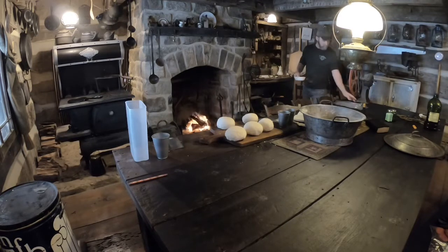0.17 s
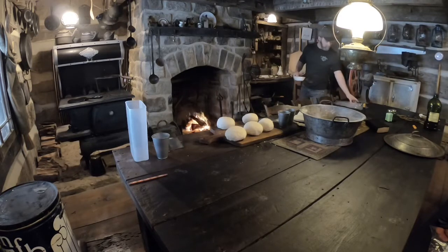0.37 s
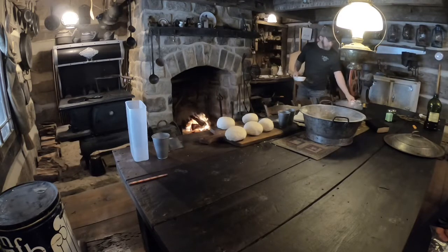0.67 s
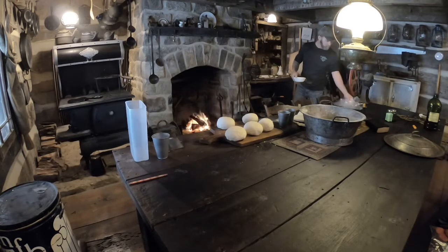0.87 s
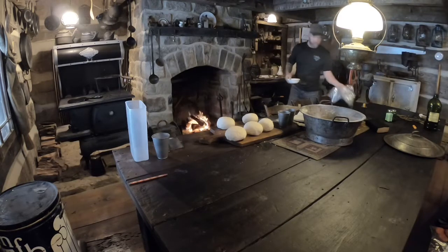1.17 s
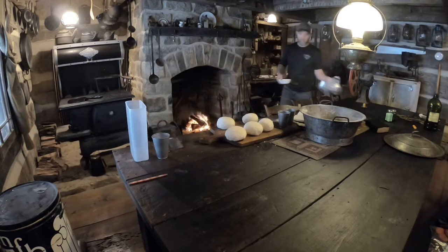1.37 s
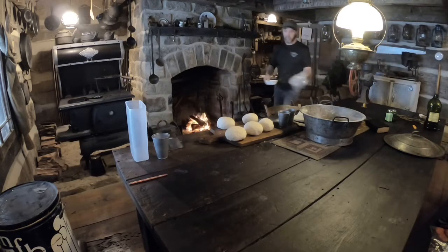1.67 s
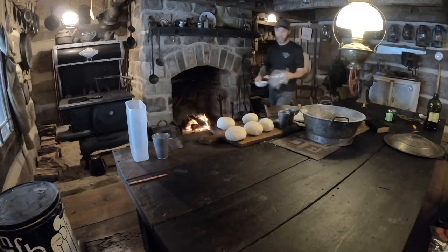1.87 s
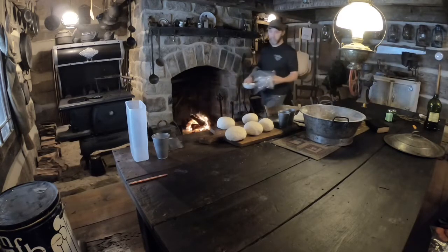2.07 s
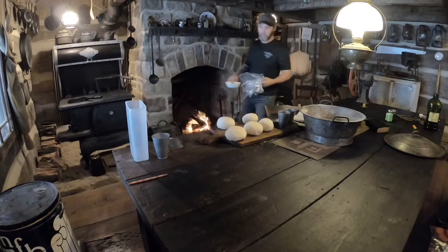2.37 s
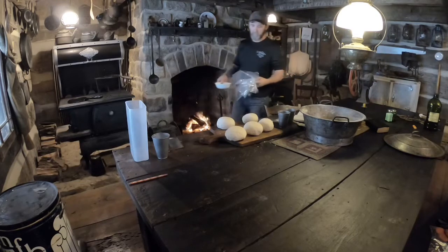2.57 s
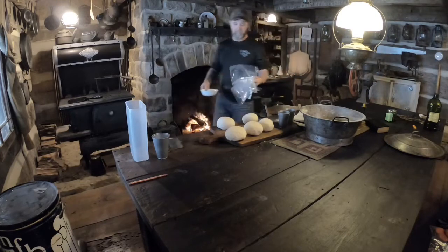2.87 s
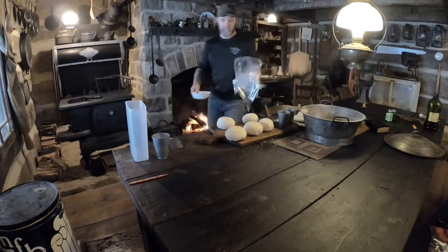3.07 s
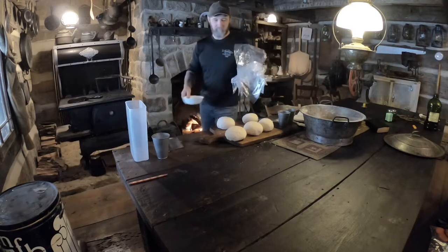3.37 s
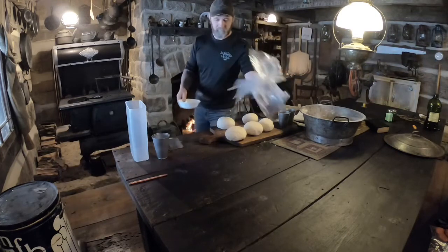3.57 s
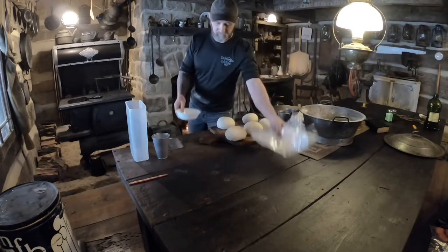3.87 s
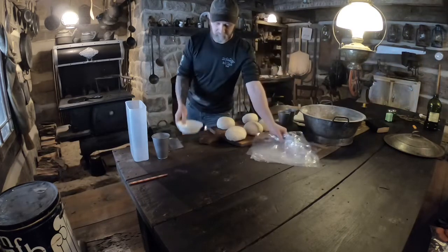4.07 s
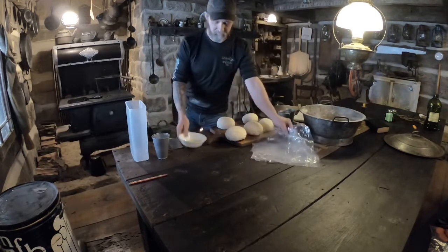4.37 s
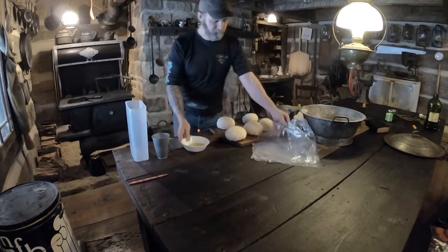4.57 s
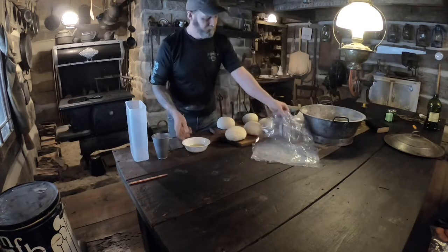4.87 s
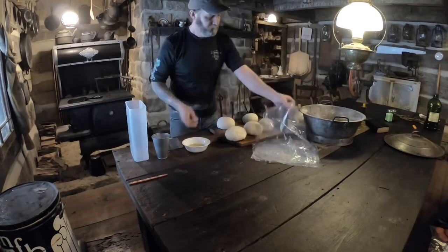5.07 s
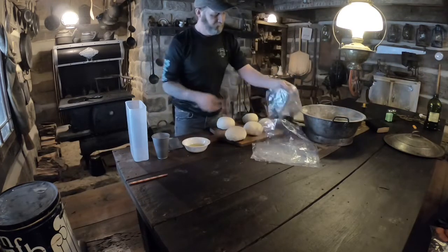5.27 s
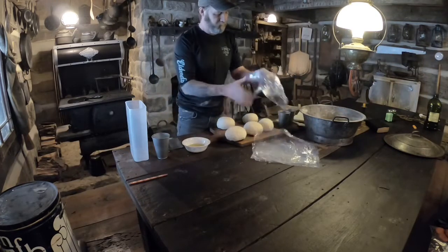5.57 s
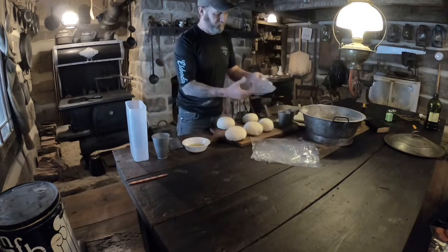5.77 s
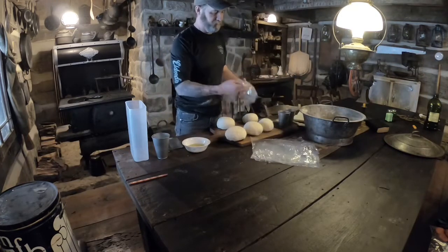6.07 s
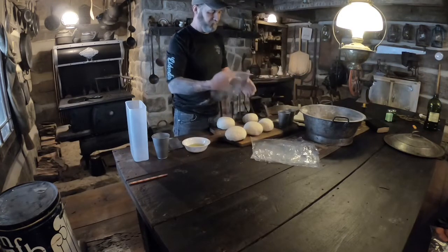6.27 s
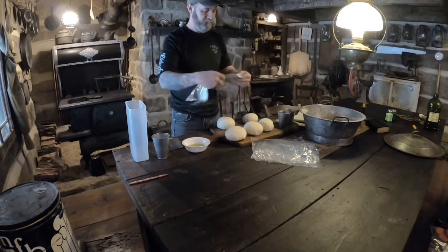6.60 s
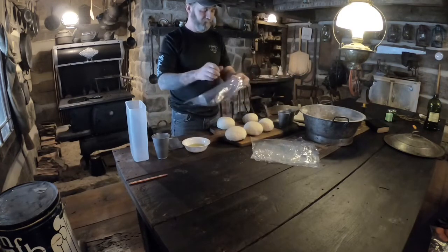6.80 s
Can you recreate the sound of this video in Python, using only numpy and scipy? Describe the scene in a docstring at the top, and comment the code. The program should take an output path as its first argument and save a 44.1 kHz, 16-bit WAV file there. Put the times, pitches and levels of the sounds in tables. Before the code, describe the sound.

A table-top stereo microphone picks up dull footfalls on floorboards, light cloth and film rustling, and rumbling vibration through the wood. At about four and a half seconds a bowl hits the planks hard, clattering briefly as it settles. Afterwards there is only crisp plastic crinkling with small snaps, over a faint steady air bed and a thin, high insect tick in a small dry room.

```python
"""Bowl and film in a log kitchen

A small two-port camera stands on a plank table. Steps knock the floorboards, a small bowl is set down and
plastic film rustles: struck wood and bowl are decaying modes plus a noise thud, film is grainy noise.
Boards and joists shake the camera as swelling low noise; fire and room air are a steady noise bed.
An insect ticks faintly: short bursts of narrow-band noise."""
import sys
import numpy as np
from scipy import signal
from scipy.fft import rfft, irfft, next_fast_len
from scipy.io import wavfile
from scipy.ndimage import uniform_filter1d

SR = 44100
rng = np.random.default_rng(int(sys.argv[2]) if len(sys.argv) > 2 else 0)


def to_wav(sig):
    """Store sig (one row per channel, or 1-D mono) as 16-bit WAV at the path in sys.argv[1].

    Samples outside -1..1 are clipped; the rate is SR.
    """
    pcm = np.clip(np.atleast_2d(sig), -1, 1) * 32767
    pcm = np.round(pcm).astype(np.int16)
    wavfile.write(sys.argv[1], SR, pcm.T)  # frames by channels


N = 305877
T = np.arange(N) / SR
SIZE = next_fast_len(N + SR)
HZ = np.maximum(np.arange(SIZE // 2 + 1) * SR / SIZE, 1.)

# bowl meeting the table, rocking and settling: (time [s], level [dB], contact [ms])
BOWL_CONTACTS = [(4.505, -12.5, 0.28), (4.512, -12, 0.41), (4.519, -18, 0.58), (4.528, -18, 1.1),
                 (4.545, -14.5, 0.6), (4.575, -18, 0.69), (4.61, -27, 0.98), (4.687, -13.5, 1.3),
                 (4.72, -20.5, 0.96), (4.734, -14.5, 1.36), (4.752, -23.5, 1.2), (4.796, -33, 0.98)]
# rim of the bowl clinking: (time [s], level [dB])
RIM_CLINKS = [(4.505, -49), (4.5105, -33), (4.683, -52)]
# heels, toes and bumps on wood: (time [s], level [dB], contact [ms], left minus right at the source [dB])
STEP_CONTACTS = [(0.541, -42, 0.53, -3), (0.548, -46.5, 0.67, 2), (0.584, -43.5, 0.89, -3),
                 (0.782, -57.5, 0.18, 8.5), (1.136, -54, 0.24, 5), (1.304, -50, 0.63, 4),
                 (1.347, -55, 0.19, 3), (1.429, -57, 0.21, 3), (1.875, -54.5, 0.12, 13),
                 (1.959, -58, 0.18, 10), (1.985, -45, 0.13, 4), (2.014, -41, 0.29, 1),
                 (2.045, -53, 0.43, -4), (2.118, -51, 0.11, 1), (2.679, -60, 0.23, 4),
                 (2.761, -31, 0.39, 1), (2.884, -69, 0.31, 1), (2.923, -56.5, 0.13, 19),
                 (3.346, -54, 0.16, 5), (3.399, -55, 0.12, 8), (3.447, -44.5, 0.12, 2.5),
                 (3.484, -52, 0.47, 0), (3.52, -54, 0.58, 17), (4.065, -53.5, 0.23, 5)]
# weight coming down on floor or table:
# (time [s], rise [ms], hold [s], joist sway [dB], board shudder [dB], board rattle [dB])
FLOOR_LOADS = [(0.004, 17, 0.048, -51, -56, -70), (0.173, 35, 0.053, -52, -60, -60.5),
               (0.42, 74, 0.052, -63, -70, -54.5), (0.545, 8.7, 0.075, -64, -61, -58),
               (0.8, 44, 0.086, -62, -77, -54.5), (1.1, 4.5, 0.15, -54, -39, -51.5),
               (1.317, 9.3, 0.07, -47, -50.5, -44.5), (1.448, 28, 0.11, -43.5, -55, -54.5),
               (1.873, 6.2, .02, -59, -61, -53), (1.943, 19, 0.051, -53, -45, -58),
               (1.991, 22, 0.13, -34, -29.5, -40), (2.174, 17, 0.037, -35.5, -43.5, -60),
               (2.402, 8.3, .03, -48, -75, -72), (2.673, 4, .055, -39, -33.5, -48.5),
               (2.76, 6, 0.12, -31.5, -29.5, -35.5), (2.987, 43, 0.036, -43.5, -43.5, -55),
               (3.315, 39, 0.026, -36, -56.5, -61), (3.441, 36, 0.085, -35.5, -41.5, -47),
               (3.661, 47, 0.049, -41, -73, -74), (4.077, 18, 0.053, -57.5, -65, -52.5),
               (4.4, 64, 0.079, -62, -55.5, -70), (4.523, 17, 0.15, -38, -28.5, -34),
               (4.72, 20, 0.054, -50, -37, -51), (4.85, 17, .03, -46, -53, -48),
               (4.962, 23, 0.12, -31, -30.5, -55), (5.183, 41, 0.034, -38.5, -62, -66),
               (5.35, 15, 0.017, -46.5, -67, -73), (5.802, 36, 0.023, -64, -79, -65),
               (6.302, 48, 0.194, -77, -61.5, -78), (6.77, 12, 0.046, -57, -66, -76)]
# stiff creases of film popping: (time [s], level [dB])
CREASE_POPS = [(4.8194, -45), (5.1594, -45), (5.1664, -56), (5.2247, -46), (5.3294, -61), (5.8194, -55),
               (6.124, -57), (6.2846, -61), (6.589, -47), (6.9006, -40)]
# folds of film and clothes moving: (time [s], crinkle [dB], rustle re crinkle [dB], rise [ms], fade [ms])
FILM_FOLDS = [(0.262, -74.5, 5, 2.9, 130), (0.42, -59.5, -2, 92, 250), (0.62, -58, 0.5, 100, 69),
              (0.79, -64, 0.5, 38, 130), (0.93, -60.5, -3.5, 140, 170), (1.31, -76, 11.5, 21, 180),
              (1.44, -64.5, 4.5, 7.2, 54), (1.873, -59.5, 5.5, 1.7, 57), (1.966, -58, 4.5, 15, 66),
              (2.1, -74, 6, 28, 210), (2.47, -70, -23, 19, 46), (2.78, -71, 14, 22, 35),
              (2.87, -61, 6, 38, 57), (2.923, -60, 4, 2.3, 45), (3.259, -63.5, 3, 2.5, 180),
              (3.35, -67.5, 6.5, 23, 110), (3.446, -68, 12, 6, 80), (3.6, -65.5, -1.5, 130, 120),
              (3.912, -57, -2, 36, 170), (4.07, -71, 3.5, 28, 79), (4.23, -61.5, -4.5, 24, 69),
              (4.43, -61, -3, 55, 120), (4.508, -50.5, -15, 2.3, 25), (4.59, -60, 6, 22, 74),
              (4.8014, -59.5, 6, 3.2, 45), (5.0, -65.5, -2.5, 360, 250), (5.136, -57, -6, 4.9, 63),
              (5.23, -64, -5.5, 30, 200), (5.398, -64.5, -3, 2, 25), (5.48, -67.5, -13, 29, 97),
              (5.7, -68, -12.5, 10, 34), (5.77, -60.5, -4.5, 31, 150), (5.87, -64, -9, 10, 11),
              (5.97, -63, -10, 16, 53), (6.0186, -59.5, -6.5, 2.5, 100), (6.13, -64.5, -4.5, 26, 270),
              (6.419, -59, -2, 5.2, 83), (6.585, -57.5, -5, 58, 180), (6.72, -65.5, -4, 140, 86),
              (6.8815, -55, -1.5, 9, 120)]
# insect runs, now and then a faster buzz: (time [s], length [s], rate [ticks/s], level [dB])
INSECT_RUNS = [(0.04, 1.05, 23.6, -73), (1.116, .75, 23.6, -70), (1.432, .05, 70, -69),
               (2.124, .27, 23.6, -72), (2.44, .07, 65, -69), (2.541, .19, 23.1, -70),
               (2.781, .2, 23.8, -70), (3.003, .23, 24.2, -69), (3.3, 3.6, 23.6, -72)]

# modes of plank top, bowl, floorboards and crease: (frequency [Hz], relative level [dB], t60 [s])
PLANK_MODES = [(125, -5, .25), (165, -7, .15), (195, -1, .2), (223, 2, .26), (252, 1, .24), (287, -10, .18),
               (317, -9, .18), (372, -11, .17), (415, -11, .17), (452, -12, .17), (512, -11, .16),
               (563, -8, .16), (605, -6, .17), (636, -17, .7), (700, -1, .15), (808, -7, .14),
               (829, -4, .18), (921, -13, .13), (1095, -7, .12), (1285, -7, .12), (1435, -14, .12),
               (1712, -24, .09), (2094, -26, .08)]
RIM_MODES = [(3497, 0, .09), (3600, -3, .06), (3400, -9, .04), (6050, 1, .045), (7300, -8, .03)]
FLOORBOARD_MODES = [(250, 0, .05), (330, -3, .045), (700, -6, .035), (830, -8, .035), (1300, -14, .025),
                    (1550, -16, .025)]
CREASE_MODES = [(2950, 0, .018), (3350, 0, .018), (2500, -4, .015), (3900, -4, .012)]

# noise colours before band limits: (frequency [Hz], relative gain [dB])
CRINKLE_COLOUR = [(2060, -19), (3500, -8.5), (4730, -9), (6400, 0), (6840, -1), (7580, -4.5), (8240, -14.5),
                  (9240, -17.5), (12800, -27), (14800, -29)]
RUSTLE_COLOUR = [(210, -7), (350, 12), (437, 0), (552, 0), (834, 11), (1020, 2.5), (1320, 8), (1520, 5),
                 (3280, 0.5), (5000, -8.5), (6500, -9), (11000, -120)]
MURMUR_COLOUR = [(59, -42), (100, -22.5), (172, 8.5), (231, -8), (555, -17), (729, -6), (880, -9),
                 (1040, -14.5), (1420, -16.5), (2500, -29), (4990, -35.5), (6690, -34.5), (8240, -31.5),
                 (12500, -32.5), (14800, -54)]

# correlation of airborne noise at the two ports: (frequency [Hz], correlation [0 to 1])
PORT_LIKENESS = [(100, 0.5), (200, 0.3), (300, 0), (700, 0.93), (1800, 0.58), (3400, 0.57), (6000, 0.32),
                 (9000, 0)]
# the camera rocks, ports partly in opposition: (frequency [Hz], correlation [-1 to 1])
ROCKING_LIKENESS = [(20, 0.036), (100, -0.71), (150, 0.33), (300, -0.069)]
# knocks come from one side: (frequency [Hz], left phase lead [rad])
KNOCK_PHASE = [(20, 0), (500, .2), (650, -.9), (1450, -1.1), (2500, 0)]
# ports on the housing: (frequency [Hz], left phase lead [rad]); (frequency [Hz], left minus right [dB])
PORT_PHASE = [(20, 0), (350, 0), (460, -1.1), (600, -3.2), (1100, -3.5), (1900, -4.5), (2600, -5.7),
              (3500, -6.0)]
PORT_BALANCE = [(60, -6), (110, 1.5), (200, -3), (370, -3), (690, -4), (1260, 0.5), (2320, 0.5), (4260, -2),
                (7830, -0.5), (14400, 0)]

INERTIA_S = .012  # each of two smoothing passes on the floor levels
FILM_REST_DB, FILM_REST_BODY_DB = -76, -6.5  # the bundle is never quite still
INSECT_HZ, INSECT_WIDTH_HZ, INSECT_HALF_LEVEL_MS = 6750, 350, 3
MURMUR_RMS_DB = -64
ROOM_T60_S, ROOM_DB, ROOM_DULL_HZ = .3, -13, 2500
HOUSING_HZ, HOUSING_WIDTH_HZ, HOUSING_DB = 700, 235, 5  # hollow behind the ports
TOP_HZ = 14700


def bowl():
    """Each contact rings the plank top; the rim clinks a few times in its own high modes."""
    top = sum(knock(s, db, contact_ms, PLANK_MODES, thud_db=1.5, thud_t60_ms=148, thud_hz=524, order=2)
              for s, db, contact_ms in BOWL_CONTACTS)
    rim = sum(knock(s, db, 0.025, RIM_MODES) for s, db in RIM_CLINKS)
    return np.tile(top + rim, (2, 1))


def steps():
    """Each contact excites the board modes with different weights, as at another spot."""
    out = np.zeros((2, N))
    for s, db, contact_ms, balance_db in STEP_CONTACTS:
        hit = knock(s, db, contact_ms, FLOORBOARD_MODES, thud_db=13, thud_t60_ms=204, thud_hz=255)
        out += hit * undb(np.array([[balance_db], [-balance_db]]) / 2)
    return out


def floor():
    """Loads shake joists and boards, and so the table and camera: three bands of swelling noise."""
    s, rise_ms, hold_s, sway_db, shudder_db, rattle_db = np.transpose(FLOOR_LOADS)
    rise_s = rise_ms / 1000
    shake = pair(over_hz(ROCKING_LIKENESS))
    sway = steady(shape(shake, band(19, 50)), .08)
    shudder = steady(shape(shake, band(52, 112) ** 2), .04)
    rattle = shape(shake, band(125, 303) / HZ)
    # the heavy joists answer 30 ms late; each motion keeps a share of the hold
    sway_gain = swells(s + .03, sway_db, rise_s, fade_s=.068, hold_s=.95 * hold_s, rest_db=-68.5)
    shudder_gain = swells(s, shudder_db, rise_s, fade_s=.038, hold_s=.82 * hold_s, rest_db=-72.5)
    rattle_gain = swells(s, rattle_db, rise_s, fade_s=.031, hold_s=.58 * hold_s, rest_db=-65)
    return eased(sway_gain) * sway + eased(shudder_gain) * shudder + eased(rattle_gain) * rattle


def crease_pops():
    """A stiff crease pops and rings for an instant."""
    return np.tile(sum(knock(s, db, 0.063, CREASE_MODES) for s, db in CREASE_POPS), (2, 1))


def film():
    """Many tiny creases snap: noise whose level jumps grain by grain and swells with each fold."""
    s, crinkle_db, body_db, rise_ms, fade_ms = np.transpose(FILM_FOLDS)
    rise_s, fade_s = rise_ms / 1000, fade_ms / 1000
    snapping = rng.random(N) < 150 / SR  # 150 per second on average
    snaps = snapping * undb(5 * np.clip(rng.standard_normal(N), -2, 2))
    snap_power = signal.lfilter([1], [1, -np.exp(-1 / (0.0021 * SR))], snaps ** 2)  # 2.1 ms time constant
    grain = np.sqrt(0.24 + snap_power / 8)
    noise = grain * pair(over_hz(PORT_LIKENESS))
    crinkle = shape(noise, undb(over_hz(CRINKLE_COLOUR)) * band(3260, 15000))
    rustle = shape(noise, undb(over_hz(RUSTLE_COLOUR)) * band(530, 3440))
    crinkle_gain = swells(s, crinkle_db, rise_s, fade_s, 0, FILM_REST_DB)
    rustle_gain = swells(s, crinkle_db + body_db, rise_s, fade_s, 0, FILM_REST_DB + FILM_REST_BODY_DB)
    return crinkle_gain * crinkle + rustle_gain * rustle


def insect():
    """Short bursts in one narrow band, slightly uneven in time and level."""
    gate = np.zeros(N + SR)
    for s, length_s, rate, db in INSECT_RUNS:
        times = np.arange(s, s + length_s, 1 / rate)
        chance = rng.standard_normal((200, 2))[:len(times)]
        at = ((times + .0015 * chance[:, 0]) * SR).astype(int)
        gate[at] = undb(db + 1.5 * chance[:, 1])
    burst = np.hanning(int(2 * INSECT_HALF_LEVEL_MS * SR / 1000))
    gate = signal.fftconvolve(gate, burst)[:N]
    colour = np.exp(-.5 * ((HZ - INSECT_HZ) / INSECT_WIDTH_HZ) ** 2)
    return gate * shape(pair(over_hz(PORT_LIKENESS)), colour)


def murmur():
    """Fire draught and room air: a steady, faint noise bed."""
    colour = undb(over_hz(MURMUR_COLOUR)) * band(120, 15000)
    return undb(MURMUR_RMS_DB) * shape(pair(over_hz(PORT_LIKENESS)), colour)


def room(x):
    """Direct sound plus a short, dull tail from the log walls, different at each port."""
    t = T[:SR // 2]
    tail = rng.standard_normal((2, len(t))) * undb(-60 * t / ROOM_T60_S) * np.minimum(t / 0.002, 1)
    tail = signal.sosfilt(signal.butter(1, ROOM_DULL_HZ, fs=SR, output="sos"), tail)
    tail *= undb(ROOM_DB) / np.sqrt(np.sum(tail ** 2) / 2)
    return x + signal.fftconvolve(x, tail, axes=1)[:, :N]


def knock(s, db, contact_ms, modes, thud_db=-99., thud_t60_ms=100., thud_hz=500., order=1):
    """One contact: clear modes, weighted by the spot struck, and the crowd of weak ones as fading noise."""
    t = T[:3 * SR // 4]
    spot_db = 3 * rng.standard_normal(len(modes))
    body, struck = np.zeros(len(t)), np.zeros(len(t))
    for (hz, mode_db, t60_s), offset_db in zip(modes, spot_db):
        ring = undb(mode_db - 60 * t / t60_s) * np.sin(2 * np.pi * hz * t)
        body += ring
        struck += undb(offset_db) * ring
    broad = signal.butter(order, [thud_hz / 2, thud_hz * 2], "bandpass", fs=SR, output="sos")
    thud = signal.sosfilt(broad, rng.standard_normal(len(t)))
    thud *= undb(thud_db - 60 * t / (thud_t60_ms / 1000))
    # force rises and falls, peaking at a quarter of the contact; a longer contact is duller
    push_t = t[:SR // 50]
    push = push_t * np.exp(-push_t / (max(contact_ms, .05) / 4000))
    sound = signal.fftconvolve(struck / np.max(np.abs(body)) + thud, push / push.sum())[:len(t)]
    out, start = np.zeros(N + SR), int(s * SR)
    out[start:start + len(t)] = undb(db) * sound
    return out[:N]


def swells(s, db, rise_s, fade_s, hold_s, rest_db):
    """Gain of overlapping swells (exponential rise, hold, fade), added in power over a resting level."""
    power = np.full(N, undb(2 * rest_db))
    for at, peak_db, rise, fade, hold in np.broadcast(s, db, rise_s, fade_s, hold_s):
        early, late = np.maximum(at - T, 0), np.maximum(T - at - hold, 0)
        power += undb(2 * peak_db) * np.exp(-2 * (early / max(rise, 1 / SR) + late / max(fade, 1 / SR)))
    return np.sqrt(power)


def eased(gain):
    """Inertia: two moving averages, so the floor cannot start or stop abruptly."""
    size = int(INERTIA_S * SR)
    return uniform_filter1d(uniform_filter1d(gain, size=size), size=size)


def steady(x, window_s):
    """Even out the slow beats of narrow noise; rms 1."""
    y = x / (uniform_filter1d(np.mean(x ** 2, axis=0), size=int(window_s * SR)) + .05) ** 0.24
    return y / np.sqrt(np.mean(y ** 2))


def pair(likeness):
    """Noise at the two ports, correlated as given in each bin."""
    c = np.clip(likeness, -1, 1)
    mid, side = rfft(rng.standard_normal((2, SIZE)))
    mid, side = mid * np.sqrt(1 + c), side * np.sqrt(1 - c)
    return irfft(np.array([mid + side, mid - side]), SIZE)[:, :N]


def shape(x, gain):
    """Filter by a gain per bin; rms 1."""
    y = irfft(rfft(x, SIZE) * gain, SIZE)[..., :N]
    return y / np.sqrt(np.mean(y ** 2))


def band(lo_hz, hi_hz):
    """Steep band-pass gain per bin."""
    return 1 / np.sqrt((1 + (lo_hz / HZ) ** 8) * (1 + (HZ / hi_hz) ** 8))


def lead(x, radians, tilt_db):
    """Give the left port a phase lead and a level edge in each bin, split between the ports."""
    half = np.exp(.5j * radians) * undb(tilt_db / 2)
    return irfft(rfft(x, SIZE) * np.array([half, 1 / half]), SIZE)[:, :N]


def over_hz(table):
    """A (frequency, value) table interpolated over log frequency at every bin."""
    hz, value = np.transpose(table)
    return np.interp(np.log(HZ), np.log(np.maximum(hz, 1.)), value)


def undb(db):
    """Decibels to gain."""
    return 10 ** (np.asarray(db) / 20)


def scene():
    """Knocks fill the room; floor, film, insect and bed reach the ports as they are."""
    knocks = lead(room(steps() + bowl() + crease_pops()), over_hz(KNOCK_PHASE), 0.)
    return knocks + floor() + film() + murmur() + insect()


def record(dry):
    """The housing lifts one band, the ports differ in phase and level by frequency; the top is cut."""
    b, a = signal.iirpeak(HOUSING_HZ, HOUSING_HZ / HOUSING_WIDTH_HZ, fs=SR)
    housed = dry + (undb(HOUSING_DB) - 1) * signal.lfilter(b, a, dry)
    ports = lead(housed, over_hz(PORT_PHASE), over_hz(PORT_BALANCE))
    return signal.sosfilt(signal.ellip(8, .2, 60, TOP_HZ, fs=SR, output="sos"), ports)


dry = scene()
out = record(dry)
to_wav(out)
```